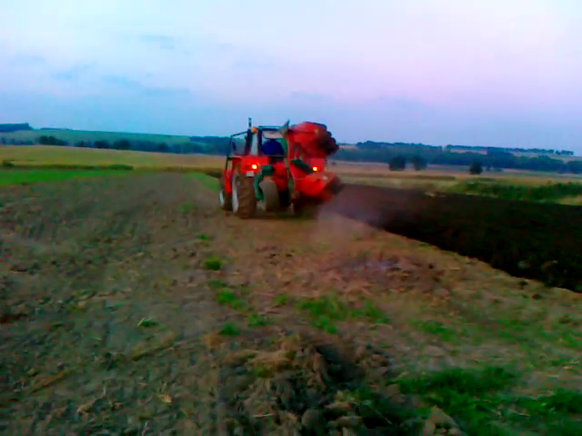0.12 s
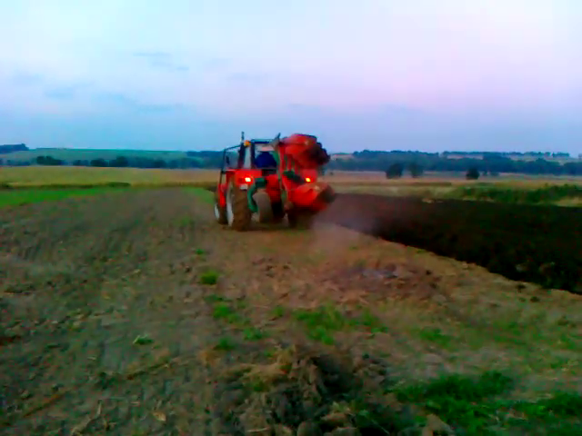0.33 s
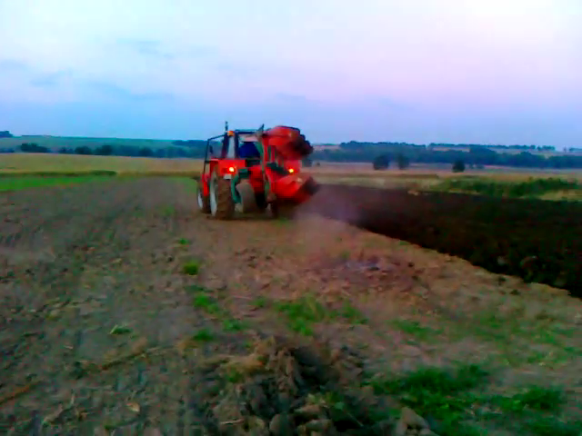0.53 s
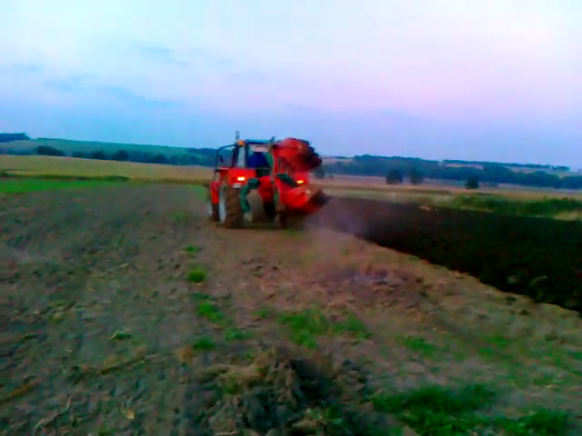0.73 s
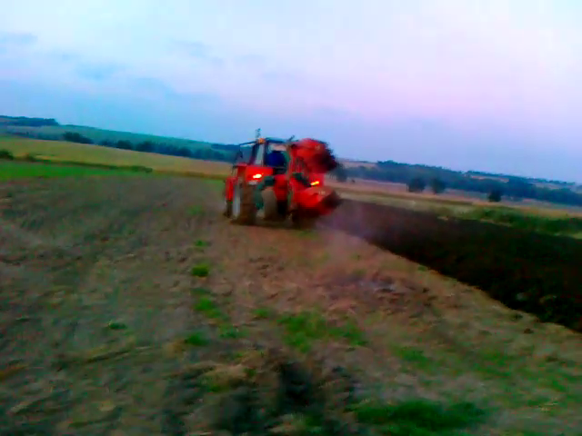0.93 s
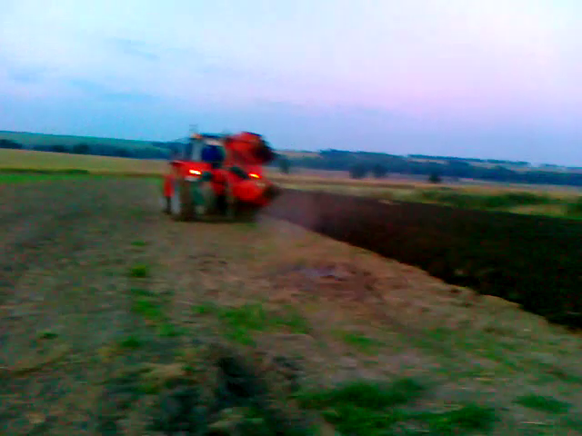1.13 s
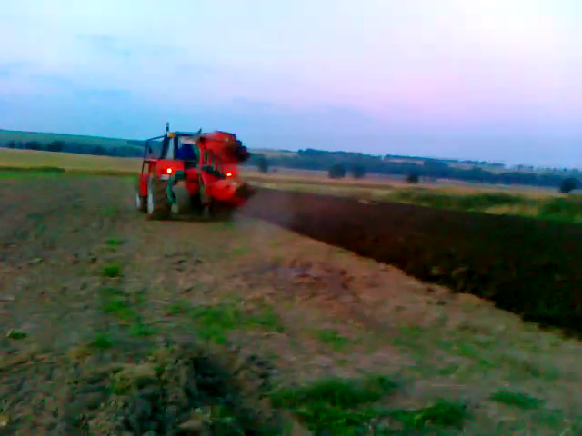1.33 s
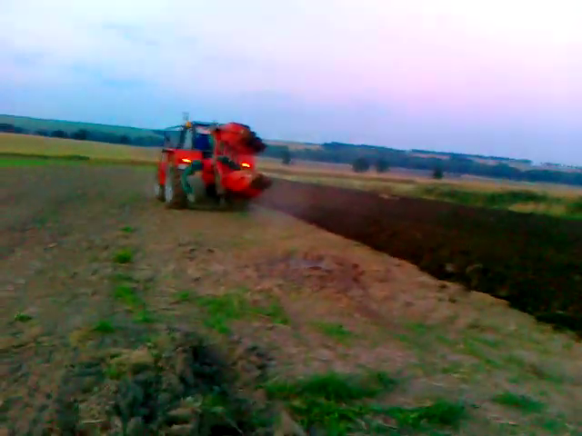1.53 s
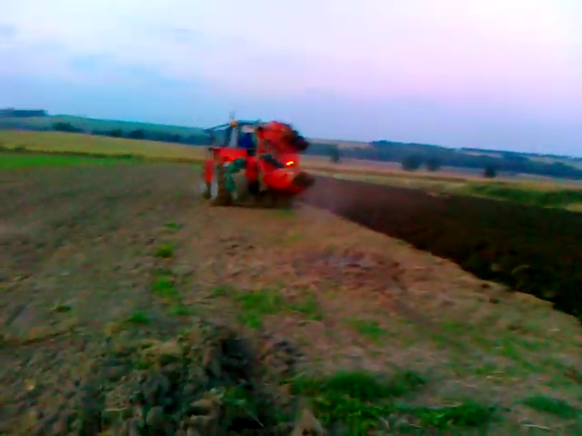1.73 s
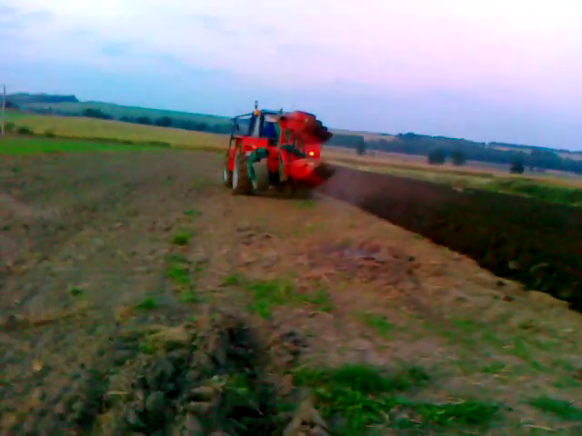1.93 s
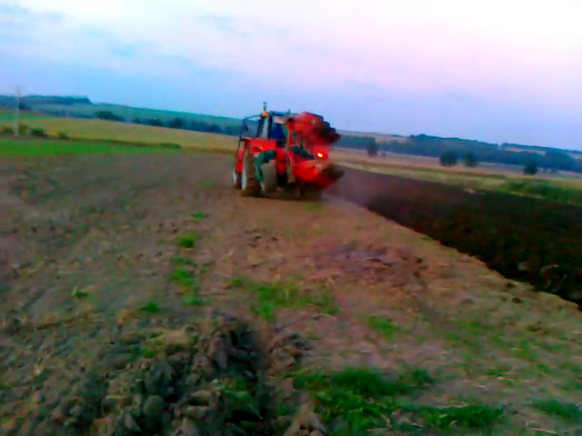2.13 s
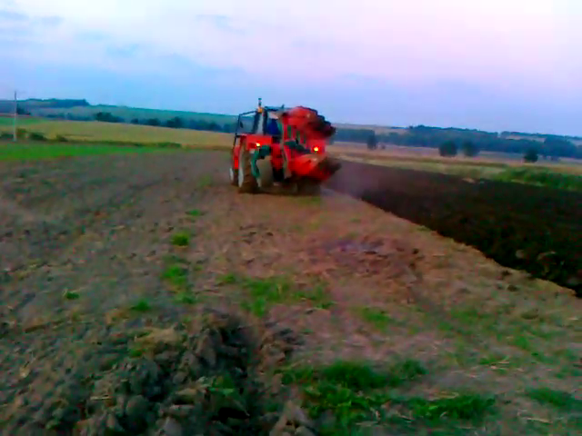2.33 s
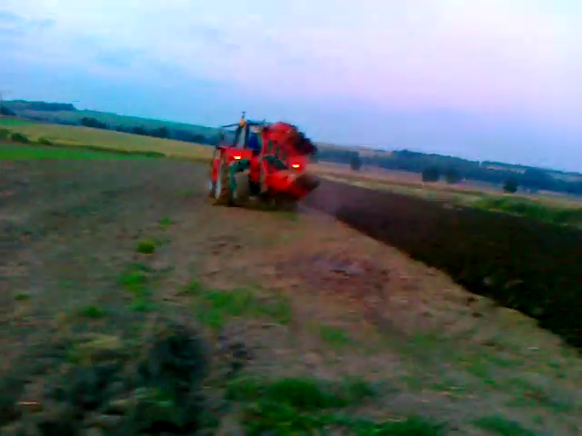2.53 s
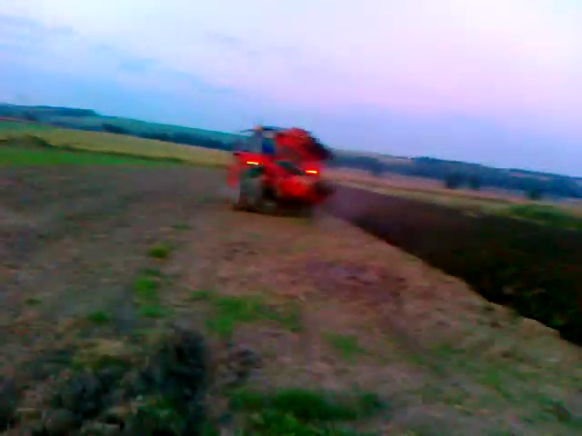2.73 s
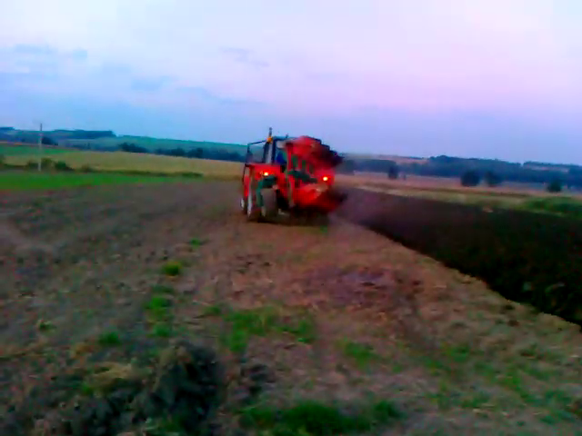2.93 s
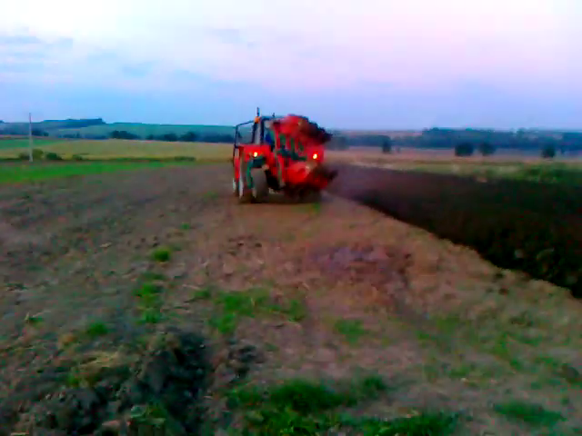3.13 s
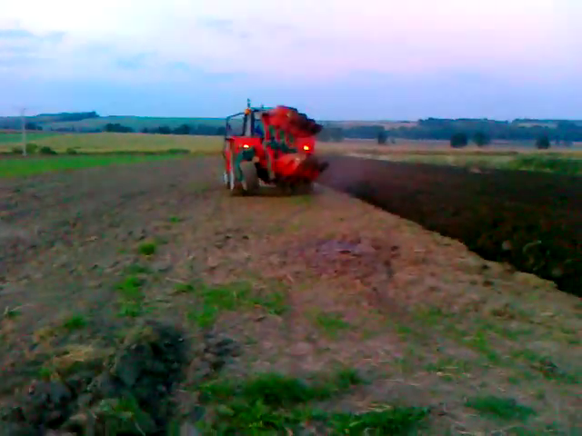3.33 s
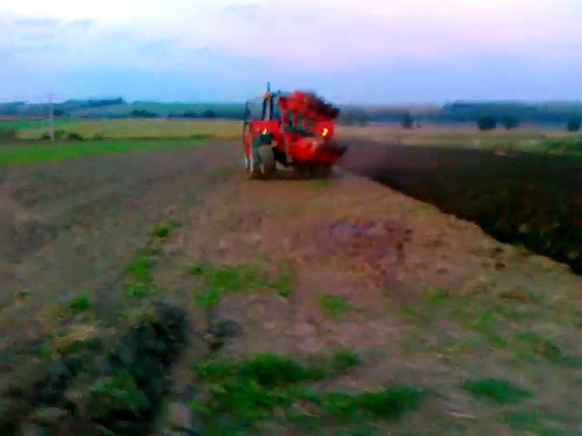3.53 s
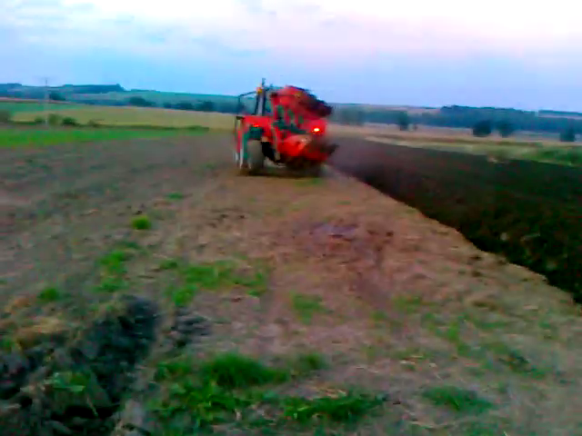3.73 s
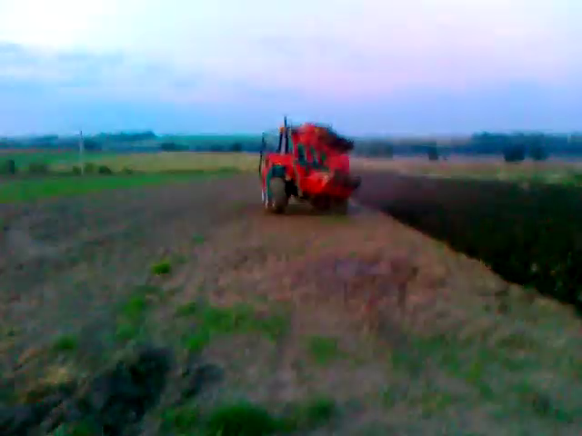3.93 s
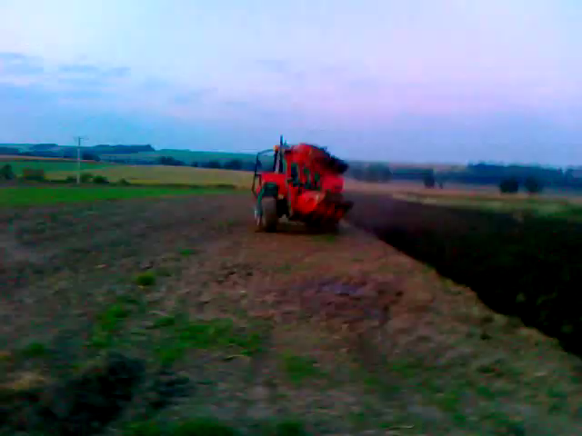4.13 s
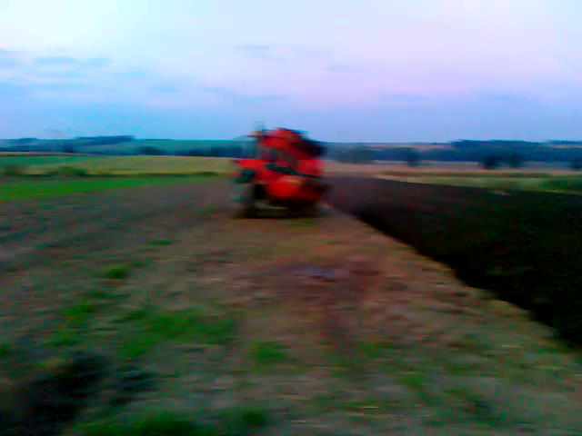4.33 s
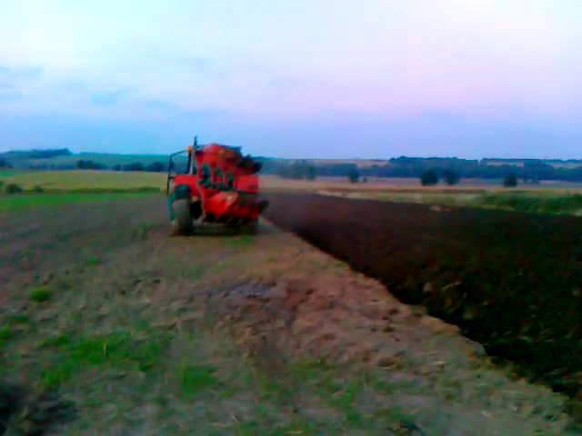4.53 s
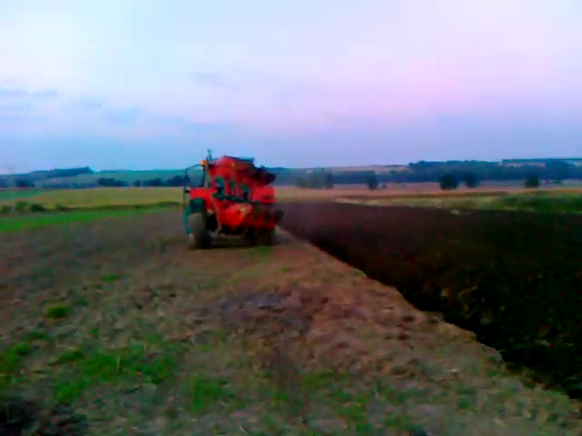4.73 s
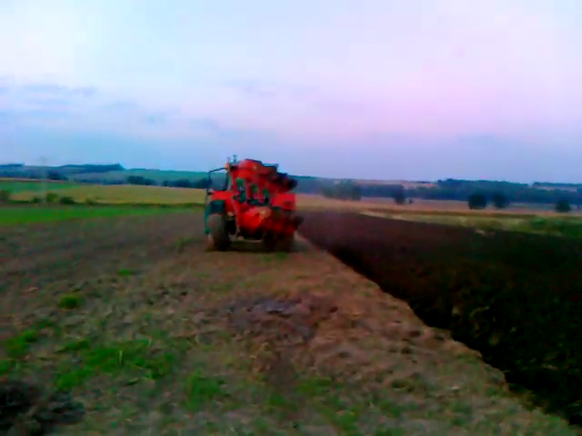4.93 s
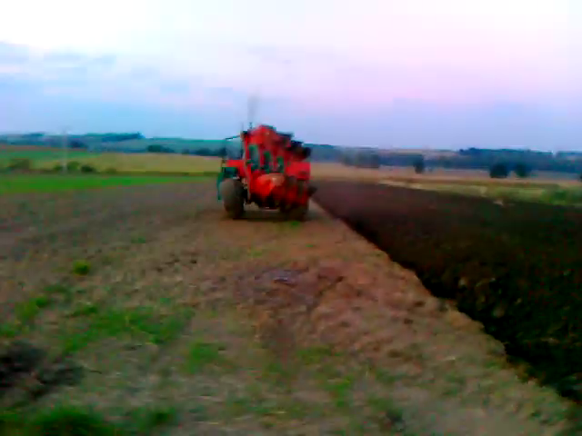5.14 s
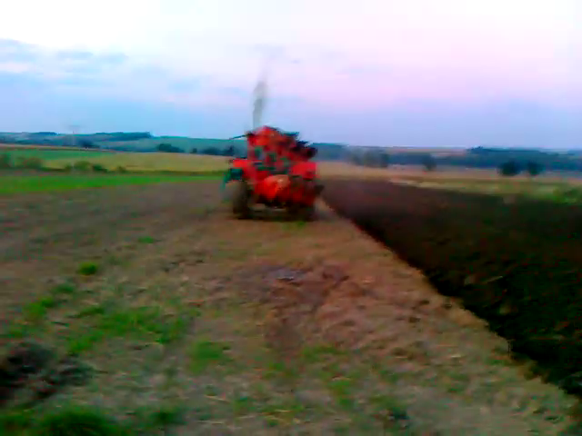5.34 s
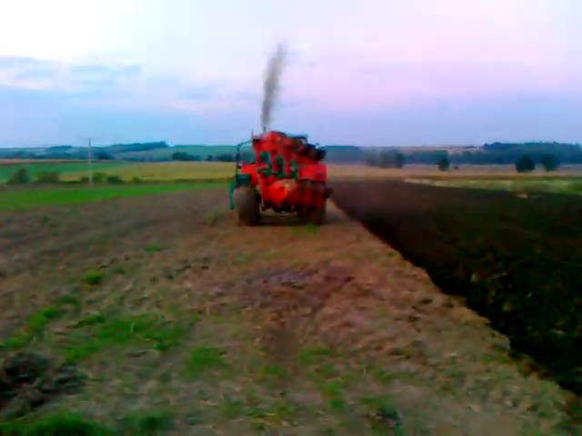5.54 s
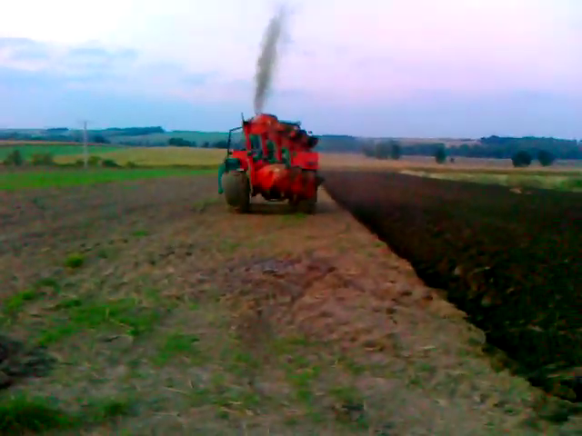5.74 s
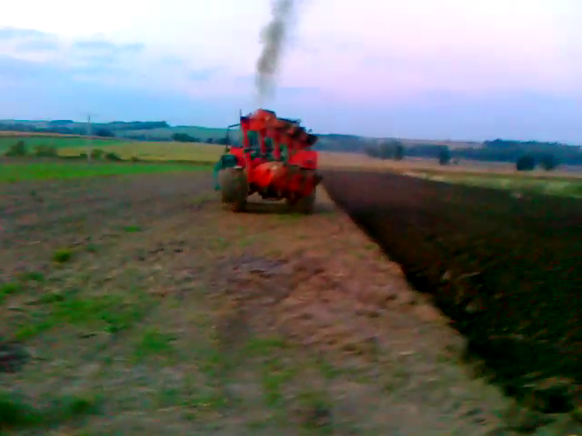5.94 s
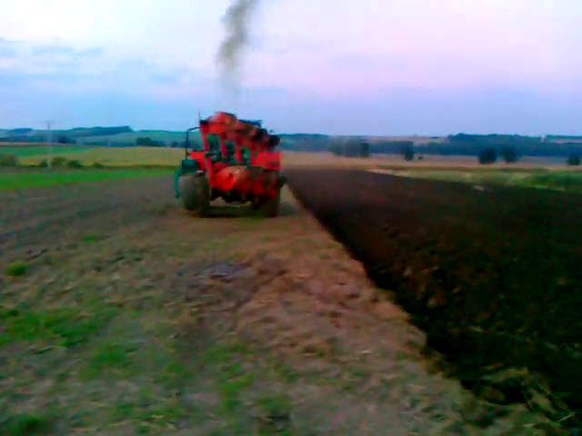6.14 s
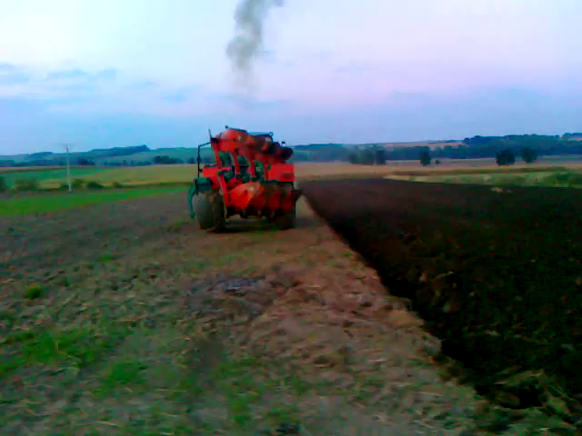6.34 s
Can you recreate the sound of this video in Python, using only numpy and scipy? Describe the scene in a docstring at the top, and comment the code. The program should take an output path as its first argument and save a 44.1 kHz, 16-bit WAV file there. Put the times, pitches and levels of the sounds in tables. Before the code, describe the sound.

Steady throbbing diesel idle with clattering block and dry stubble crunches; near the end it dips, barks and climbs rapidly to a loud drone.

```python
"""A six-cylinder diesel tractor idles, lugs briefly and revs up: each firing throbs in the exhaust.
The firings also knock in the block and ring the panels; at speed the exhaust note turns to drone and growl.
Under load, gas puffs bark, rasp and chirp out of the stack.
Behind the engine, thin whines flicker, loose plough irons clink, dry stubble crunches and a low hum comes twice.
Tones are sines or narrow noise; the rest is noise shaped by firing bursts, spectra and resonances."""
import sys
import numpy as np
from scipy import signal
from scipy.fft import rfft, irfft
from scipy.io import wavfile
from scipy.ndimage import uniform_filter1d

SR = 44100
rng = np.random.default_rng(int(sys.argv[2]) if len(sys.argv) > 2 else 0)


def unload_wav(signal):
    """Save mono or channel-first audio to the path in sys.argv[1] as 16-bit WAV at rate SR, clipped to [-1, 1]."""
    wavfile.write(
        sys.argv[1],
        SR,
        np.round(np.clip(np.atleast_2d(signal).T, -1, 1) * 32767).astype(np.int16),
    )


N = 281790
TIME = np.arange(N) / SR


def undb(db):
    """Decibels to gain."""
    return 10 ** (np.asarray(db) / 20)


def unit(x):
    """Scale to rms 1."""
    return x / np.std(x)


def curves(rows):
    """Each column of a table, joined by straight lines in time."""
    s, *columns = np.transpose(rows)
    return [np.interp(TIME, s, c) for c in columns]


def ramp(start_s, length_s):
    """Rises from 0 to 1 and stays."""
    return np.clip((TIME - start_s) / length_s, 0, 1)


def fade(start_s, decay_s):
    """Stays at 1, then dies away."""
    return np.exp(-np.maximum(TIME - start_s, 0) / decay_s)


def noise():
    """White noise."""
    return rng.standard_normal(N)


def walk(rate_hz):
    """Smooth random wander, spread near 1."""
    k = int(SR / rate_hz)
    steps = np.repeat(rng.standard_normal(N // k + 1), k)
    return unit(uniform_filter1d(steps, k)[:N])


def lowpass(x, hz):
    """Steep treble cut."""
    return signal.sosfilt(signal.butter(4, hz, fs=SR, output="sos"), x)


def colour(x, points):
    """Filter by a spectrum of (Hz, dB) points; it falls steeply below the first."""
    hz, db = np.transpose(points)
    f = np.arange(N // 2 + 1) * SR / N + 1e-3  # offset avoids log(0)
    bass_cut = np.sqrt(1 + (hz[0] / f) ** 8)
    gain = undb(np.interp(np.log(f), np.log(hz), db)) / bass_cut
    return irfft(rfft(x) * gain, N)


def resonate(x, modes):
    """Sum of two-pole resonances (Hz, width in Hz, dB)."""
    out = 0
    for hz, width_hz, db in modes:
        b, a = signal.iirpeak(hz, hz / width_hz, fs=SR)
        out = out + undb(db) * signal.lfilter(b, a, x)
    return out


def narrow(hz, half_width_hz):
    """A noisy resonance that follows a moving centre; rms 1."""
    sos = signal.butter(2, half_width_hz, fs=SR, output="sos")
    drift = signal.sosfilt(sos, noise() + 1j * noise())
    carrier = np.exp(2j * np.pi * np.cumsum(hz) / SR)
    return unit((drift * carrier).real)


def reflect(x, tail_s=0.0098, echo_db=0, dull_hz=1300):
    """A dense, dull cluster of short reflections between engine and soil."""
    t = TIME[:SR // 10]
    response = rng.standard_normal(len(t)) * np.exp(-t / tail_s)
    response = lowpass(response * undb(echo_db) / np.linalg.norm(response), dull_hz)
    response[0] += 1  # direct sound
    return unit(signal.fftconvolve(x, response)[:N])


def swell(firings, at, sharp, floor):
    """A burst once per firing, centred at a share of the cycle; rms 1."""
    g = floor + np.exp(sharp * (np.cos(2 * np.pi * (firings - at)) - 1))
    return g / np.sqrt(np.mean(g ** 2))


# Relative strength of the cylinders. Each entry: level in dB, which the growl doubles.
CYLINDER_DB = [0.9, -0.9, 0.2, -0.7, 1.2, -1.3]


def cyclic(firings, size=4096):
    """A random clatter that repeats with every engine cycle."""
    train = rng.standard_normal(size)
    place = (firings / len(CYLINDER_DB) * size).astype(int)
    return np.take(train, place, mode="wrap")


# Low exhaust tones. Each row: multiple of the firing rate, level at idle in dB, level at high speed in dB.
THROB_TONES = [(2 / 3, -31, -32), (1, 0, 0), (4 / 3, -24, -30), (3 / 2, -27, -24), (5 / 3, -23, -30),
               (2, -9, -21), (3, -19, -32)]


def throb(firings, fast, load, waver_db=0.5):
    """The low exhaust tones; under load their overtones lag less, so the wave peaks harder."""
    # at idle each overtone lags a quarter cycle more: the pressure rises slowly and drops quickly
    lag = np.pi / 2 * (1 - load / 2)
    tones = 0
    for k, idle_db, high_db in THROB_TONES:
        gain = undb(idle_db + fast * (high_db - idle_db))
        tones = tones + gain * np.cos(2 * np.pi * k * firings - (k - 1) * lag)
    return np.sqrt(2) * undb(waver_db * walk(25)) * tones


# Colour of the idling exhaust. Each row: frequency in Hz, spectral level in dB.
MUTTER_SPECTRUM = [(55, 7.5), (100, 2), (140, 4.5), (200, -0.5), (280, -11.5), (370, -8), (475, -3.5),
                   (560, -16), (900, -15.5), (3000, -65)]
# Silencer resonances. Each row: frequency in Hz, width in Hz, gain in dB.
PIPE_MODES = [(190, 16, -25), (274.5, 74, 9), (487, 53, 1), (477, 29, 4), (527, 52, -22)]


def exhaust(firings, effort, scatter_db=2, rough=2.02, uneven_db=2):
    """Unequal blow-down pulses and their turbulence: a mutter at idle, ringing the silencer with effort."""
    count = firings.astype(int)
    strength_db = scatter_db * walk(60) + uneven_db * np.cos(np.pi * count)
    pulses = np.diff(count, prepend=0) * undb(strength_db)
    flow = unit(pulses) + rough * noise() * swell(firings, 0.04, 0.17, 0.92)
    mutter = unit(colour(flow, MUTTER_SPECTRUM))
    ring = unit(lowpass(resonate(flow, PIPE_MODES), 940))
    pipe = np.sqrt(1 - effort) * mutter + np.sqrt(effort) * ring
    return pipe / np.sqrt(uniform_filter1d(pipe ** 2, SR // 4))  # steady strength


# Silencer bands that bring out crankshaft harmonics. Each row: centre in Hz, width in Hz, gain in dB.
DRONE_BANDS = [(180.8, 12, -3), (276, 78, 5.5), (440, 59, -1), (524, 66, -1), (536, 55, -0.5)]


def drone(firings, hz, waver_db=3.0, second_db=8, between_db=-5):
    """Crankshaft harmonics (three firings a turn) light up as they climb through the silencer's resonances."""
    out = 0
    for k in range(6, 34):
        gain = 0
        for centre_hz, width_hz, db in DRONE_BANDS:
            gain = gain + undb(db) / (1 + ((k * hz / 3 - centre_hz) / (width_hz / 2)) ** 2)
        # twice the firing rate leads; harmonics between the firing orders are weaker
        order_db = second_db * (k == 6) + between_db * (k % 3 > 0)
        # uneven crank speed blurs the higher harmonics most
        phase = 2 * np.pi * (k * firings / 3 + rng.random()) + .031 * k * walk(45)
        out = out + gain * undb(order_db + waver_db * walk(14)) * np.cos(phase) / np.sqrt(k)
    return out / np.sqrt(uniform_filter1d(out ** 2, SR // 4))  # steady strength


# Colour of the growl at speed. Each row: frequency in Hz, spectral level in dB.
GROWL_SPECTRUM = [(130, 0), (280, 3), (370, -3), (540, 0), (640, -6), (800, -6), (1000, -11), (1600, -25),
                  (4000, -60)]


def growl(firings, growl_db=-37.5):
    """At speed the six unequal blasts tear the exhaust note into a dense, rough growl."""
    cylinder_db = np.take(CYLINDER_DB, (firings + .5).astype(int) % len(CYLINDER_DB))
    blasts = (noise() + cyclic(firings, size=1024)) * swell(firings, 0, 1.6, .25)
    return unit(colour(blasts * undb(2 * cylinder_db), GROWL_SPECTRUM)) * undb(growl_db)


# Engine block resonances. Each row: frequency in Hz, width in Hz, gain in dB.
BLOCK_MODES = [(496, 44, 6.5), (777, 45, 12), (1036, 64, 6.5)]
# Colour of the block knock. Each row: frequency in Hz, spectral level in dB.
KNOCK_SPECTRUM = [(200, 7.5), (380, 7), (620, 3), (800, 1.5), (1000, 3), (1400, 5), (1580, 4.5),
                  (1800, 5.5), (2100, -1), (2350, -9), (2700, -12), (3150, -8.5), (3600, -19), (4700, -17),
                  (6500, -25.5), (8000, -28), (11000, -34.5), (16000, -50)]


def knock(firings, scatter_db=1.0, ring_db=-5):
    """Each combustion rattles the block; valves and gears repeat part of their clatter every engine cycle."""
    cylinder_db = np.take(CYLINDER_DB, firings.astype(int) % len(CYLINDER_DB))
    clatter = noise() + .8 * cyclic(firings)
    blows = clatter * swell(firings, .4, 1.4, 1.1) * undb(cylinder_db + scatter_db * walk(45))
    ring = resonate(noise() * swell(firings, 0.61, 0.14, 1.0) * undb(cylinder_db), BLOCK_MODES)
    struck = colour(reflect(blows, echo_db=-10), KNOCK_SPECTRUM)
    return unit(struck + undb(ring_db) * lowpass(ring, 2370))


# Bright panel rings. Each row: pitch at idle in Hz, rise at full speed in Hz, half-width in Hz.
BONNET_RINGS = [(1790, 200, 60), (2060, 150, 50), (2330, 60, 130)]
# Ring levels, shifting with the viewing angle.
# Each row: time in seconds, low ring in dB, middle ring in dB, high ring in dB.
BONNET_RING_LEVELS = [(0, -45, -56, -46.5), (.75, -43.5, -54, -50.5), (1.35, -42.5, -41, -52.5),
                      (1.95, -44.5, -43, -57), (2.3, -40.5, -49, -50), (2.5, -42.5, -48, -63),
                      (2.75, -44, -45, -53), (3.7, -41.5, -49, -60), (4.1, -45.5, -53.5, -60),
                      (4.8, -44.5, -42.5, -62), (5.3, -48, -48, -63.5), (6.39, -52, -52, -55.5)]


def bonnet(firings, fast):
    """Thin panels ring in a burst with every firing; their pitch rises with speed."""
    rings = 0
    for (hz, rise_hz, half_width_hz), db in zip(BONNET_RINGS, curves(BONNET_RING_LEVELS)):
        rings = rings + narrow(hz + rise_hz * fast ** 2, half_width_hz) * undb(db)
    return rings * swell(firings, 0.28, 1.5, 1.0)


# Single puffs fuse into a roar between these firing rates.
FUSE_FROM_HZ, FUSED_HZ = 54, 72
# Colour of the gas jet. Each row: frequency in Hz, spectral level in dB.
GAS_SPECTRUM = [(200, -1.5), (500, 8.5), (650, -4), (900, -1), (1150, 4.5), (1500, 1), (2050, 4.5),
                (2600, -16), (3500, -13.5), (4100, -20), (5300, -21), (6600, -25.5), (10200, -28.5),
                (11500, -41.5), (14000, -35), (16000, -60)]


def gas(firings, hz, scatter_db=1.8, roar_db=0.5):
    """Each firing ends in a hard, rasping puff of noise; the puffs fuse into a roar at speed."""
    fused = np.clip((hz - FUSE_FROM_HZ) / (FUSED_HZ - FUSE_FROM_HZ), 0, 1)
    stroke = (firings + .5).astype(int)
    size = undb(scatter_db * rng.uniform(-1.6, 1, stroke.max() + 1))[stroke]
    puffs = swell(firings, .02, 2.0, .21) * size * undb(1.5 * np.tanh(walk(400)))
    roar = swell(firings, .02, 1.2, .95) * undb(roar_db)
    jet = unit(noise() + .5 * cyclic(firings)) * (puffs * (1 - fused) + roar * fused)
    return colour(jet, GAS_SPECTRUM) / np.std(colour(noise(), GAS_SPECTRUM))


IDLE_HZ, FULL_HZ = 43.84, 87.7  # firing rates
# Ring of the stack in slow, hard barks.
# Each row: pitch at idle in Hz, rise in Hz per Hz of firing rate, half-width in Hz, level in dB.
BARK_RINGS = [(1850, 8, 330, -45), (3350, 20, 170, -48), (6000, 15, 150, -59)]


def bark(firings, hz, fast):
    """Slow, hard puffs ring the stack; the ring climbs and fades as the engine gathers speed."""
    rings = 0
    for centre_hz, rise, half_width_hz, db in BARK_RINGS:
        rings = rings + narrow(centre_hz + rise * (hz - IDLE_HZ), half_width_hz) * undb(db)
    return rings * swell(firings, .98, 2.0, .22) * (1 - fast) ** 1.8


def rasp(firings, flow, resonance, half_width_hz=380, rasp_db=-49, by_stack_db=2.5):
    """A fast jet breaks into a broad, rising hiss, boosted while the stack resonates."""
    hiss = narrow(4920 + 430 * flow, half_width_hz)  # centre in Hz
    bursts = swell(firings, .91, 1.5, .9)
    return hiss * bursts * np.sqrt(flow) * undb(rasp_db + by_stack_db * resonance)


def chirp(firings, flow, at=0.89, base_hz=4740, rise_hz=478, scatter_hz=84.7):
    """The jet whistles briefly just before each firing's puff, each time at a slightly different pitch."""
    hz = base_hz + rise_hz * flow + scatter_hz * (.6 * walk(120) + 1.5 * walk(900))
    bursts = swell(firings, at, 4.5, .03) * undb(3 * np.tanh(walk(60)))
    return np.sqrt(2) * np.sin(2 * np.pi * np.cumsum(hz) / SR) * bursts


# Thin metallic whine. Each row: frequency in Hz, half-width in Hz, level in dB, change under strain in dB.
WHINE_TONES = [(478, 7, -56, 0), (759, 6, -53.5, -2), (4877, 12, -73, 6), (5570, 55, -69.5, 0)]


def whine(strain, waver_db=1.5, flicker_db=3):
    """Thin metallic tones flicker over the engine; one sings up as the drive takes the strain."""
    out = 0
    for hz, half_width_hz, db, by_strain_db in WHINE_TONES:
        wander_db = waver_db * np.tanh(walk(3.84)) + flicker_db * np.tanh(walk(22))
        out = out + narrow(np.full(N, hz), half_width_hz) * undb(db + by_strain_db * strain + wander_db)
    return out


# Ring of the plough irons. Each row: frequency in Hz, t60 in seconds, gain in dB.
IRON_MODES = [(4830, 0.44, 0), (5420, 0.078, 3), (5580, 0.099, 13), (6990, 0.14, 7.5), (7700, 0.054, 5),
              (8740, 0.053, 5), (10200, .1, -17)]
# Clinks of the irons. Each row: start in seconds, level in dB before the common trim.
IRON_CLINKS = [(0.031, -35.5), (0.184, -39.5), (0.383, -43), (0.478, -43), (0.882, -43), (1.214, -44),
               (1.29, -47), (1.5, -47), (2.174, -44), (2.335, -46), (2.39, -44.5), (2.52, -45),
               (2.739, -43), (2.883, -44), (3.16, -44.5), (3.242, -42), (3.409, -44), (3.6, -44),
               (3.82, -49), (4.46, -45), (4.571, -44), (4.74, -48)]


def irons(clink_db=-6, jiggle_db=-72, patchy_db=2, chatter_s=0.025, scrape=0.62):
    """Loose irons jiggle all the time and clink at bumps; each contact favours other modes."""
    t = TIME[:SR // 3]
    out = np.zeros(N + len(t))
    for s, db in IRON_CLINKS:
        ring = 0
        for hz, t60_s, gain_db in IRON_MODES:
            gain = undb(gain_db + patchy_db * rng.standard_normal())
            ring = ring + gain * np.exp(-np.log(1000) * t / t60_s) * np.sin(2 * np.pi * hz * t)
        contact = rng.standard_normal(len(t)) * np.exp(-t / chatter_s)
        clink = signal.fftconvolve(ring, contact)[:len(t)]
        clink = clink / np.abs(clink).max() + scrape * resonate(contact, [(7260, 2600, 0)])
        start = int(s * SR)
        out[start:start + len(t)] += undb(db + clink_db) * clink
    modes = [(hz, np.log(1000) / np.pi / t60_s, db) for hz, t60_s, db in IRON_MODES]  # t60 to width
    jiggle = resonate(noise() * undb(8 * np.tanh(walk(12))), modes)
    jiggle = colour(jiggle, [(3000, -3), (4870, -12), (5600, -1.0), (7000, 1), (10000, 4)])
    return out[:N] + undb(jiggle_db) * unit(jiggle)


def rattle(fast, rattle_db=-60):
    """At high engine speed the loose irons buzz without a pause."""
    modes = [(hz, 300, db) for hz, _, db in IRON_MODES[3:6]]
    buzz = resonate(resonate(noise(), modes), [(7700, 1600, 0)])
    return unit(buzz) * fast * undb(rattle_db)


# Colour of the stubble. Each row: frequency in Hz, spectral level in dB.
STUBBLE_SPECTRUM = [(2000, -8), (3300, -1), (4100, 5), (5200, 3), (6500, -3), (9000, -5), (12000, -12),
                    (16000, -19)]
# Stubble crunches. Each row: peak time in seconds, level in dB, rise and decay time in seconds.
STUBBLE_CRUNCHES = [(.28, -57.5, 0.13), (0.888, -54, 0.011), (1.743, -45.5, 0.0051), (1.863, -50.5, 0.015),
                    (1.909, -46, 0.0043), (2.214, -54, 0.12), (2.643, -51, 0.025), (2.748, -53.5, .042),
                    (2.945, -51.5, 0.065), (3.488, -56, 0.071), (3.601, -48.5, 0.0086),
                    (4.084, -53, 0.0089), (4.244, -52.5, 0.015)]


def stubble(bed_db=-68, grain_db=2, bunch_db=1):
    """Dry stalks snap in dense grains, bunched where a tuft is crushed."""
    power = undb(bed_db + bunch_db * np.tanh(walk(4.1))) ** 2
    for s, db, length_s in STUBBLE_CRUNCHES:
        power = power + undb(db) ** 2 * np.exp(-np.abs(TIME - s) / length_s * 2)
    grains = noise() * undb(grain_db * walk(1500))
    return unit(colour(grains, STUBBLE_SPECTRUM)) * np.sqrt(power)


# Two swells of a low hum. Each row: start in seconds, length in seconds, level in dB.
HUM_SWELLS = [(0.323, 0.13, -34.5), (0.497, 0.14, -34)]


def hum(edge_s=0.025, start_hz=137, sag_hz_per_s=43.8):
    """A soft low sine comes twice, sinking in pitch."""
    hz = start_hz - sag_hz_per_s * (TIME - HUM_SWELLS[0][0])
    size = 0
    for s, length_s, db in HUM_SWELLS:
        size = size + undb(db) * ramp(s, edge_s) * (1 - ramp(s + length_s, edge_s))
    return np.sqrt(2) * np.sin(2 * np.pi * np.cumsum(hz) / SR) * size


FIRST_FIRING = .29  # share of a cycle before the first firing
# One push of the throttle: opens, stays down, then eases off.
THROTTLE_S, ATTACK_S, EASE_S, RELEASE_S = 5.16, 0.059, 6.032, 0.14
# Idle share of full fuelling; extra share for the first firings of the push, with its decay.
IDLE_LOAD, KICK, KICK_S = 0.083, 0.24, 0.01
# The drive takes up its strain just before the push.
STRAIN_S, STRAIN_RISE_S = 4.72, 0.34
# The stack resonates when the firing rate passes its own pitch.
STACK_HZ, STACK_SPAN_HZ = 63.5, 6.5
# Engine speed. Each row: time in seconds, firing rate in Hz.
ENGINE_SPEED = [(0.0, 43.74), (1.9, 43.18), (2.5, 43.32), (2.92, 42.09), (3.83, 42.13), (4.53, 41.74),
                (4.99, 43.5), (5.22, 38.1), (5.62, 62.11), (5.77, 69.84), (6.08, 88.27), (6.39, 92.14)]
# Level laws of the engine's voices. Each: level at idle in dB, drift in dB per second as the tractor
# moves (exhaust grows, knock fades), dB added by strain, by load, by full speed, by stack resonance.
THROB_LEVEL = (-26, 0.18, 1.86, 6, 0, 3)
PIPE_LEVEL = (-40, 0.84, 2, 4.5, 5, 1.5)
KNOCK_LEVEL = (-37, -0.61, 2, -1, 5, 2)
BONNET_TRIM = (0, 0, 0.5, 1.5, 9.5, 4)
CHIRP_LEVEL = (-78, 0, 9, 19, -7, 13)


def scene(gas_db=-31):
    """Engine speed and load drive all the engine's voices; only the knock gets short, dull reflections."""
    hz, = curves(ENGINE_SPEED)
    firings = np.cumsum(hz) / SR - FIRST_FIRING
    fast = np.clip((hz - IDLE_HZ) / (FULL_HZ - IDLE_HZ), 0, 1)  # 0 at idle, 1 at high speed
    strain = ramp(STRAIN_S, STRAIN_RISE_S)
    load = ramp(THROTTLE_S, ATTACK_S) * fade(EASE_S, RELEASE_S)
    resonance = load / (1 + ((hz - STACK_HZ) / STACK_SPAN_HZ) ** 2)

    def level_db(law):
        """A voice's level from its law."""
        idle, per_s, by_strain, by_load, by_speed, by_stack = law
        driven = by_strain * strain + by_load * load + by_speed * fast + by_stack * resonance
        return idle + per_s * TIME + driven

    pipe_db = level_db(PIPE_LEVEL)
    effort = np.clip((pipe_db + 38.0) / 10, .03, .9)
    engine = throb(firings, fast, load) * undb(level_db(THROB_LEVEL))
    # at speed the exhaust changes from a rough mutter to a pitched drone
    engine += exhaust(firings, effort) * undb(pipe_db + 1 - 2 * effort - 6 * np.sqrt(fast))
    engine += drone(firings, hz) * np.sqrt(fast) * undb(pipe_db + 0.3)
    engine += growl(firings) * np.sqrt(fast)
    engine += knock(firings) * undb(level_db(KNOCK_LEVEL))
    engine += bonnet(firings, fast) * undb(level_db(BONNET_TRIM))
    # under load the gas puffs take over from the knock
    fuel = IDLE_LOAD + load * (1 + KICK * fade(THROTTLE_S + ATTACK_S, KICK_S))
    engine += (gas(firings, hz) * undb(gas_db) + bark(firings, hz, fast)) * fuel
    engine += rasp(firings, load * fast, resonance)
    engine += chirp(firings, load * np.sqrt(fast)) * undb(level_db(CHIRP_LEVEL))
    return (engine + whine(strain) + irons() + rattle(fast) + stubble() + hum())[None]


# Colour of the microphone hiss. Each row: frequency in Hz, spectral level in dB.
HISS_SPECTRUM = [(3000, -3), (9000, -5), (16000, 7)]


def record(dry, hiss_db=-71, bass_hz=18, top_hz=17000):
    """The small microphone adds a faint hiss and loses the deepest bass and the very top."""
    heard = dry + undb(hiss_db) * unit(colour(noise(), HISS_SPECTRUM))
    thin = signal.sosfilt(signal.butter(2, bass_hz, "high", fs=SR, output="sos"), heard)
    return signal.sosfilt(signal.ellip(8, .2, 70, top_hz, fs=SR, output="sos"), thin)


dry = scene()
out = record(dry)
unload_wav(out)
```